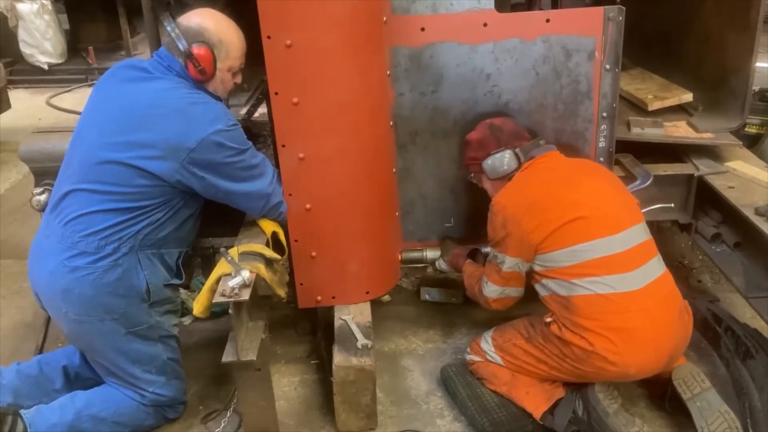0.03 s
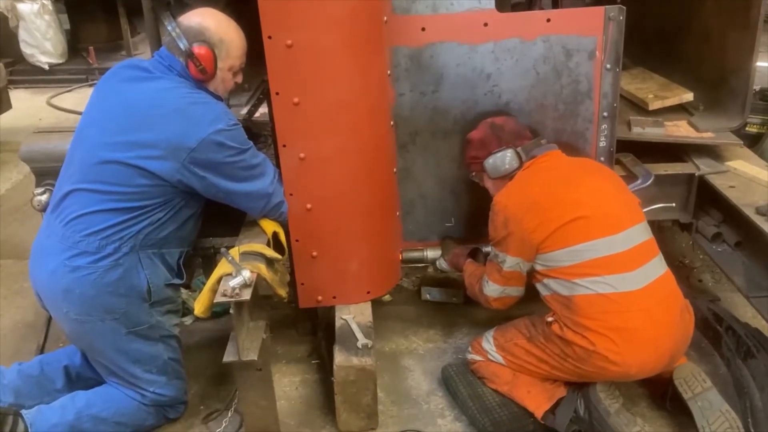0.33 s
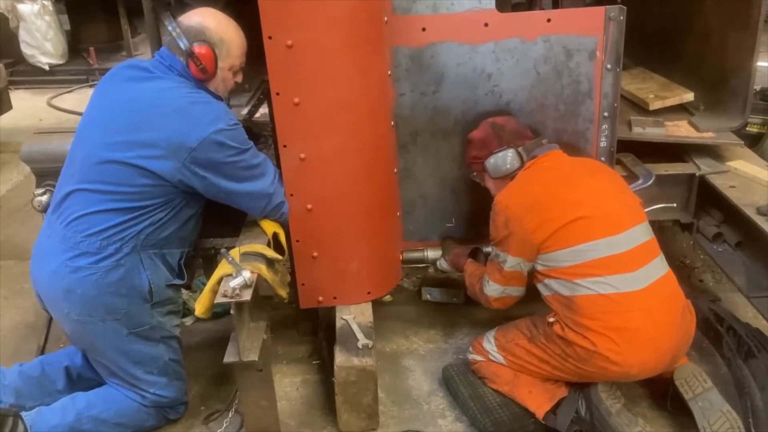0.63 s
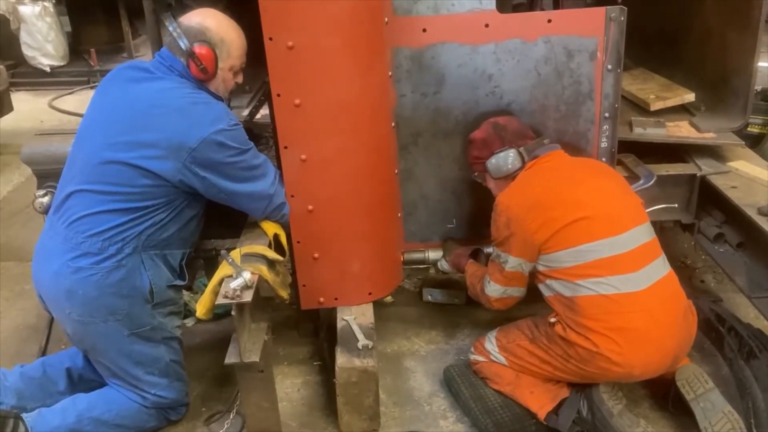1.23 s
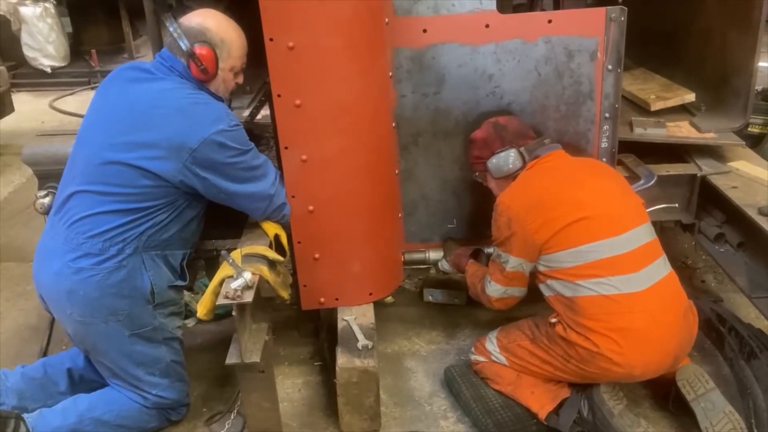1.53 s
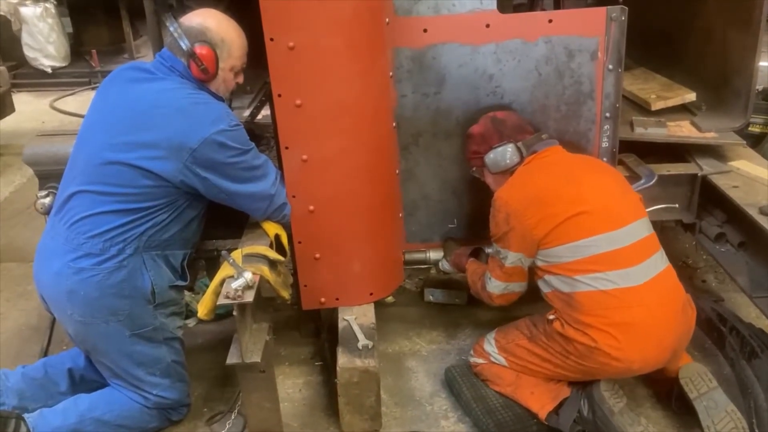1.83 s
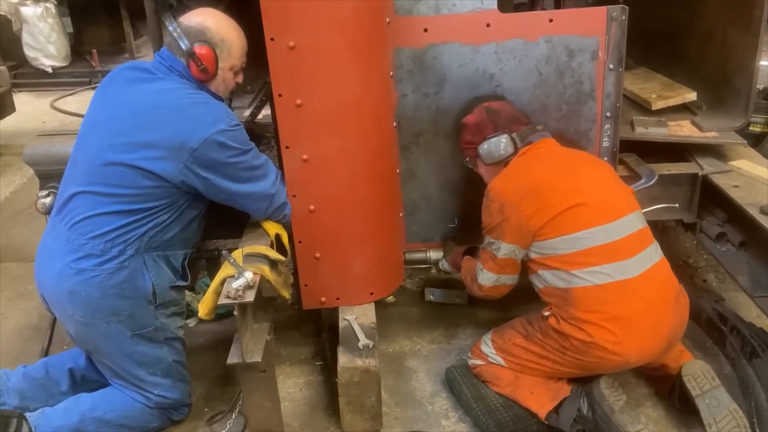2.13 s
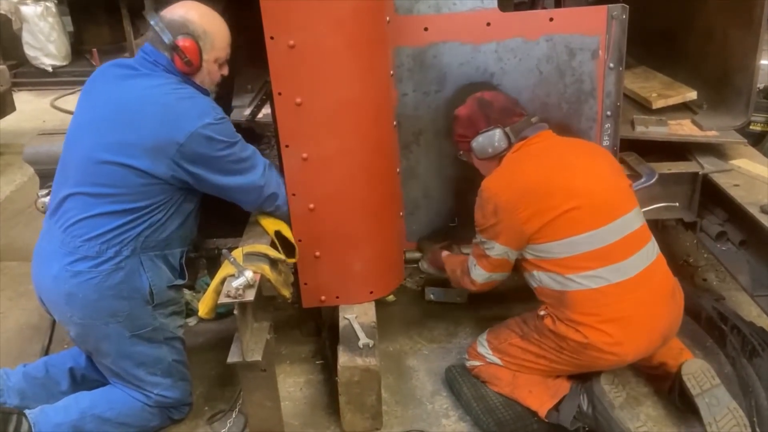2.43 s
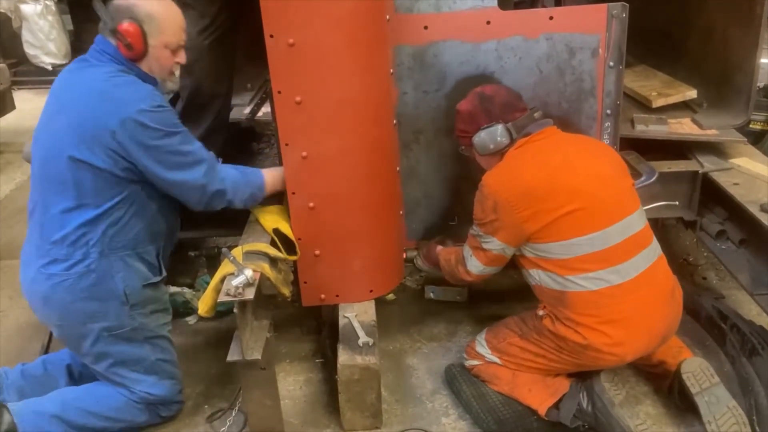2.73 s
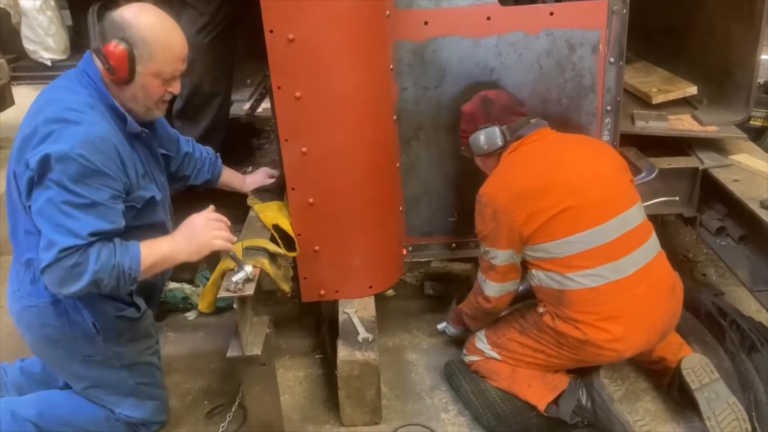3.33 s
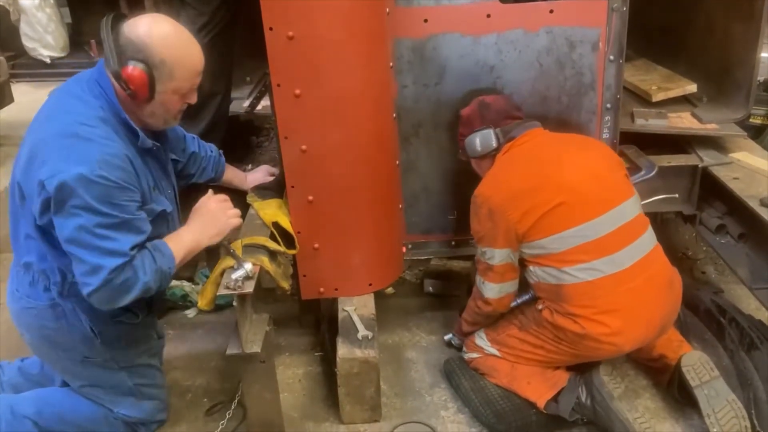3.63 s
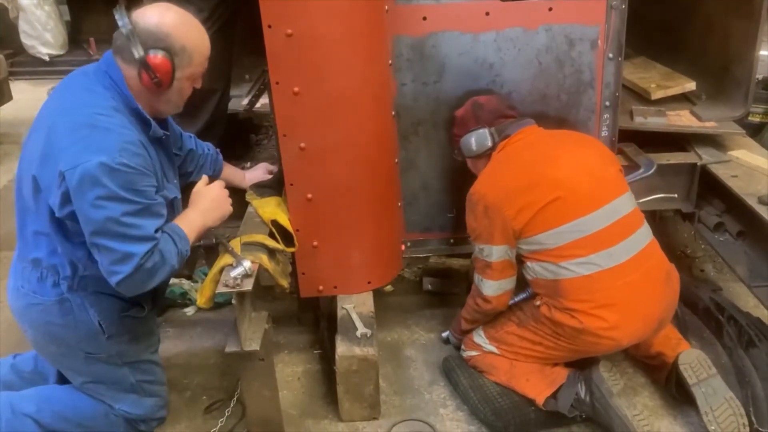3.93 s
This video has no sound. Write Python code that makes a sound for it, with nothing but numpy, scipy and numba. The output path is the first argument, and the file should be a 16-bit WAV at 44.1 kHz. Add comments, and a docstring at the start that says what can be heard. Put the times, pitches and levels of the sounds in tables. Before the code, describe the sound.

A pneumatic hammer is already riveting a steel panel, with loud, very rapid cracks and clangs over hissing air. From about 1.1 seconds the blows turn deeper and thumpier, stopping at 1.8 seconds. The workshop echo fades into faint hiss and rumble. A tool clinks lightly near 3 seconds, and around 3.8 seconds a tiny metal squeak precedes a soft double knock as it is put down.

```python
"""Riveting a steel panel

A pneumatic hammer drives a rivet at 19 blows a second in a reverberant workshop. Each blow is a steel
crack and a panel clang over hissing exhaust; once the rivet seats, bending waves add a thump.
One deep thud sits under the opening. The hammer stops and the hall rings out over a faint air hiss;
the tool clinks off the rivet, something squeaks, and the tool is put down with a knock."""
import sys
import numpy as np
from scipy import signal
from scipy.fft import rfft, irfft, next_fast_len
from scipy.io import wavfile
from scipy.ndimage import minimum_filter1d
from numba import njit

SR = 44100
rng = np.random.default_rng(int(sys.argv[2]) if len(sys.argv) > 2 else 0)


def transcribe(signal):
    """Save signal, clipped to [-1, 1], as a 16-bit WAV file at the path in sys.argv[1]."""
    frames = np.atleast_2d(signal).T
    limited = np.clip(frames, -1, 1)
    pcm = np.round(limited * 32767).astype(np.int16)
    wavfile.write(sys.argv[1], SR, pcm)


N = 176400

# the hammer's beat; blows fall evenly between these marks: blow number, t/s
BEAT_MARKS = [(0, -.4937), (11, .0850), (23, .7170), (29, 1.0336), (36, 1.4076), (42, 1.7254)]
# crack of the steel set (the hammer's tip) on the rivet: f/Hz, level/dB
CRACK_EQ = [(1500, -16), (4000, -9), (6000, -15.5), (7800, 5.5), (9200, -1.5), (10500, 7.5), (11800, 5.5),
            (13800, -1.5), (15500, 13.5), (16500, -30)]
# ping of the set: f/Hz, level/dB, t60/s
SET_MODES = [(5620, -6, .09), (6530, -6, .08), (6900, -6, .08), (7480, -3, .1), (8110, -3, .08),
             (10450, -4, .12), (11700, 4, .07), (15400, 5, .1)]
# dense clang of the panel: f/Hz, level/dB
CLANG_EQ = [(40, -17), (100, -5), (170, -3), (280, 0.5), (410, -9.5), (540, -6.5), (740, -2), (900, -6),
            (1100, -5), (1300, -9), (1900, -8), (3000, -14), (5000, -13.5), (7500, -15), (9200, -16.5),
            (11500, -10.5), (13800, -20), (15500, -30)]
# its decay: f/Hz, t60/s
CLANG_T60 = [(100, 0.12), (300, 0.15), (600, 0.095), (1000, 0.17), (2500, 0.13), (7000, 0.15),
             (15000, 0.076)]
# what a seated rivet adds to the clang: f/Hz, level/dB
SEATED_EQ = [(50, 14), (130, 8), (200, 9.5), (280, 6.5), (520, 8.5), (900, 3.5), (1500, 6), (5000, 6),
             (8000, 10.5), (12000, -4.5)]
# blows on the seated rivet; the last bites deepest: blow number, thump level/dB, bite level/dB
SEATED_BLOWS = [(32, 3, 0), (33, -4, 1), (34, 0, -2), (35, 0, 0), (36, -1, -2), (37, 2, 0), (38, 3, 2),
                (39, -5, 0), (40, 4, 2), (41, 2, 2), (42, -5, 9)]
# where the bite colours the clang: f/Hz, share (0-1)
BITE_SHARE = [(200, 0), (380, 1), (600, .8), (1500, .3), (5000, 0)]
# boom of the panel's strongest modes: f/Hz, level/dB, t60/s, change as the rivet settles/dB
PANEL_MODES = [(187, -12, .55, 4), (228, -5.5, .19, 11), (263, -7, .45, 8.5), (302, -1.5, .6, -2),
               (361, -7, .55, 5), (455, -4.5, .1, 3), (612, -8.5, .15, 2), (680, -2, .18, 5),
               (754, 4.5, .18, -4), (778, -1.5, .16, -1), (1005, -3.5, .12, 3), (1135, -5, .1, 4),
               (1485, -6.5, .13, 4), (1840, -7, .16, 4)]
# on the last tap the hammer lifts and the low modes swing freely: f/Hz, level/dB
LIFT_EQ = [(230, 5), (300, 6), (450, 0), (750, -3)]
# panel balance, left over right: f/Hz, level/dB
PANEL_PAN = [(200, 1.7), (400, 3.5), (700, 0), (1400, 0), (4000, 1.5), (8000, -1.5)]
# exhaust air: f/Hz, level/dB
EXHAUST_EQ = [(200, -7.5), (800, 6), (2000, 2), (4500, -4.5), (8000, -17.5), (9200, -33.5), (11500, -16),
              (14000, -28), (16000, -35)]
# tools moved and put down: t/s, level/dB, bass/dB, middle/dB, treble/dB
KNOCKS = [(2.952, -65.5, -2, 8, -6), (3.005, -75.5, -2, 4.5, 6), (3.882, -49.5, 2, -0.5, 0),
          (3.931, -52.5, 0.5, -1, -7.5)]
# body of a knock: f/Hz, level/dB
KNOCK_EQ = [(50, -25), (110, -5), (170, 2.5), (280, 5), (420, -6), (1100, -9), (2200, -11.5), (4500, -17.5),
            (8000, -19), (9200, -32), (10500, -19.5), (12300, -27), (13500, -42), (16000, -44)]
# its decay: f/Hz, t60/s
KNOCK_T60 = [(150, 0.64), (600, 0.33), (3000, 0.19), (11000, 0.29)]
# ring of the knocked tool: f/Hz, level/dB, t60/s
TOOL_MODES = [(254, -5, 0.34), (3740, -14, 0.5), (5857, -12, .33), (6282, -10, 0.3), (7117, -15, 0.35),
              (10050, -11, 0.2), (10620, -9, .22), (11040, -16, .23)]
# the tool leaving the rivet: t/s, level/dB, tilt about 1 kHz/(dB per octave)
CLINKS = [(2.950, -46, .5), (3.008, -60, 4)]
# ring of a clink: f/Hz, level/dB, t60/s
CLINK_MODES = [(694, 0, .1), (1570, -13, .17), (2150, -12, .14), (2680, -15, .17), (3074, -16, .22),
               (3914, -21, .09)]
# two swells of a metal squeak: t/s, width/s, f/Hz, level/dB
SQUEAKS = [(3.818, 0.011, 3930, -54), (3.843, 0.0062, 3830, -48.5)]
# colour of the workshop's reverb: f/Hz, level/dB
HALL_EQ = [(50, -24), (130, -10.5), (280, 3.5), (500, -4.5), (750, -6), (1100, -3), (2000, -3),
           (4000, -2.5), (7500, -9.5), (11000, -6.5), (16000, -26)]
# its decay: f/Hz, t60/s
HALL_T60 = [(50, 1.9), (120, 1.93), (280, 1.33), (600, 1.89), (2000, 2), (4000, 1.5), (7500, 1),
            (11000, 0.5), (16000, 0.5)]
# stereo image of reflected sound: f/Hz, left-right likeness (0-1)
ROOM_LIKENESS = [(60, 0.47), (250, 0.89), (600, 0.24), (1300, 0.15), (2800, 0.05), (8000, 0)]
# air hiss and room rumble: f/Hz, level/dB
ROOM_TONE_EQ = [(18, -35), (30, -12), (98, -6.5), (189, -8.5), (227, -1.5), (259, -7.5), (311, -4),
                (461, -16), (866, -20.5), (1320, -17), (2610, -17), (4080, -15), (7470, -14.5),
                (9220, -25.5), (11100, -17), (13700, -34), (16000, -41)]
# half-octave band centres for dense ringing: f/Hz
BANDS_HZ = 31.25 * 2 ** (np.arange(19) / 2)

PREROLL_S = 1  # the hammer is already running when the scene opens
SPAN = N + PREROLL_S * SR
TIME = np.arange(SPAN) / SR - PREROLL_S
BLOW_TIME = np.arange(8192) / SR
SETTLES_S, LAST_TAP_S = 1.06, 1.784
CRACK_DB, CRACK_T60_S, CRACK_ATTACK_S, CRACK_AHEAD_S = -40, .039, .0005, .0005
RETURN_DB, RETURN_S, CONTACT_S = -18, .035, .0009
CLANG_DB, SEATED_DAMP_S = -37, .032
REBOUND_DB, REBOUND_S, WALL_DB, WALL_S = -18.5, .0026, -16.5, .0125


def hammer():
    """The piston cracks the set on the rivet, rings the panel and clicks back; a weak tap ends the run."""
    numbers, marks_s = np.array(BEAT_MARKS).T
    times = np.r_[np.interp(np.arange(numbers[-1] + 1), numbers, marks_s), LAST_TAP_S]
    cracks = strikes([(1000, CRACK_T60_S)], likeness=[(1000, .58)], repeat=.12, count=len(times))
    clangs = strikes(CLANG_T60, ROOM_LIKENESS, repeat=.25, count=len(times))
    snap = 1 - np.exp(-BLOW_TIME / CRACK_ATTACK_S)
    contact = 1 - np.exp(-BLOW_TIME / CONTACT_S)
    seated = {row[0]: row[1:] for row in SEATED_BLOWS}
    steel, ping, panel, body = np.zeros((4, 2, SPAN))
    for blow, (start, crack, clang) in enumerate(zip(times, cracks, clangs)):
        strength, slip = rng.standard_normal(2)
        last_tap = start == times[-1]
        force = undb(.4 * strength - 3 * last_tap)
        if blow in seated:
            thump_db, bite_db = seated[blow]
            clang = seated_clang(clang, bite_db)
            add(body, force * undb(thump_db) * panel_thump(pitch=1 + .08 * slip), start)
        add(steel, force * crack * snap, start - CRACK_AHEAD_S)
        if not last_tap:
            add(steel, force * undb(RETURN_DB) * crack * contact, start + RETURN_S)
        add(panel, force * clang * contact, start)
        add(body, force * panel_boom(start > SETTLES_S and not last_tap, last_tap), start)
        add(ping, force * set_ping(), start)
    steel = undb(CRACK_DB) * np.sqrt(SR) * voiced(steel, CRACK_EQ) + ping
    panel = undb(CLANG_DB) * np.sqrt(SR) * voiced(panel, CLANG_EQ)
    rebound = undb(REBOUND_DB) * delay(panel, REBOUND_S)
    wall_slap = undb(WALL_DB) * delay(panel, WALL_S)
    panel = body + panel + rebound + wall_slap
    left = delay(steel[0], seconds=.0001716) + colour(panel[0], PANEL_PAN)
    return np.array([left, steel[1] + panel[1]])


def set_ping(level_db=-33):
    """The steel set rings in bright modes, a little different in level and tuning on each blow."""
    sway, drift = rng.standard_normal((2, len(SET_MODES)))
    return tones(SET_MODES, level_db + 2 * sway, detune=.01 * drift)


def panel_boom(settled, last_tap, level_db=-30.5):
    """The panel's strongest modes; as the rivet settles, the boom swells, sits lower and wanders more."""
    modes = np.array(PANEL_MODES)
    hz, settle_db = modes[:, 0], modes[:, 3] + 1
    sway, drift = rng.standard_normal((2, len(modes)))
    gains_db = level_db + settled * settle_db + last_tap * curve(LIFT_EQ, hz) + 1.4 * sway
    wander_hz = 9 if settled else 2
    return tones(modes[:, :3], gains_db, detune=wander_hz * drift / hz)


def seated_clang(clang, bite_db):
    """The seated rivet chokes and fattens the clang; a deeper bite pushes the low mids."""
    choked = colour(clang * np.exp(-BLOW_TIME / SEATED_DAMP_S), SEATED_EQ)
    return colour(choked, [(hz, share * bite_db) for hz, share in BITE_SHARE])


def panel_thump(pitch, start_hz=260, end_hz=48, fall_s=.009, peak_s=.016, level_db=-23):
    """A bending wave runs through the panel: its highs arrive first, so the pitch dives."""
    hz = pitch * (end_hz + (start_hz - end_hz) * np.exp(-BLOW_TIME / fall_s))
    envelope = BLOW_TIME / peak_s * np.exp(1 - BLOW_TIME / peak_s)
    return undb(level_db) * envelope * np.sin(2 * np.pi * np.cumsum(hz) / SR)


def exhaust(level_db=-31, close_s=.03):
    """Spent air hisses from the hammer until the valve closes."""
    valve = np.exp(-np.maximum(TIME - LAST_TAP_S, 0) / close_s)
    return undb(level_db) * valve * voiced(noise(SPAN, ROOM_LIKENESS), EXHAUST_EQ)


def thud():
    """A single deep thud under the opening blows."""
    return swell(peak_s=.012, width_s=.0088, hz=46.4, level_db=-17.5)


def tool_knocks(ring_db=5.5):
    """Tools are moved and put down: each knock is a dull body with a metal ring on top."""
    out = np.zeros((2, SPAN))
    for start, level_db, bass_db, middle_db, treble_db in KNOCKS:
        body = np.sqrt(SR) * voiced(dense_ring(KNOCK_T60, ROOM_LIKENESS, size=16384), KNOCK_EQ)
        metal = tones(TOOL_MODES, ring_db + rng.standard_normal(len(TOOL_MODES)))
        knock = body + metal[:body.shape[1]]
        eq = [(250, bass_db), (680, middle_db), (1100, 0), (6000, treble_db)]
        add(out, undb(level_db) * colour(knock, eq), start)
    return out


def tool_clinks():
    """The tool rings lightly as it is drawn off the rivet."""
    out = np.zeros((2, SPAN))
    octaves = np.log2(np.array(CLINK_MODES)[:, 0] / 1000)
    for start, level_db, tilt in CLINKS:
        add(out, tones(CLINK_MODES, level_db + tilt * octaves), start)
    return out


def squeak():
    """Metal squeaks in two quick swells just before the tool lands."""
    return sum(swell(*row) for row in SQUEAKS)


def hall(x, level_db=-4.5, onset_s=.0024):
    """Diffuse workshop reverb, fed from the left channel: long in the lows and mids, short on top."""
    tail = colour(dense_ring(HALL_T60, ROOM_LIKENESS, size=81920), HALL_EQ)
    tail *= 1 - np.exp(-np.arange(tail.shape[1]) / SR / onset_s)
    return undb(level_db) * signal.fftconvolve(x[:1], tail, axes=1)[:, :x.shape[1]]


def room_tone(level_db=-58.5):
    """A faint, steady bed of air hiss and workshop rumble."""
    return undb(level_db) * voiced(noise(N, ROOM_LIKENESS), ROOM_TONE_EQ)


def strikes(t60, likeness, repeat, count):
    """One object struck many times: part of its ring repeats exactly, part changes with the contact."""
    size = len(BLOW_TIME)
    shared = np.sqrt(repeat) * dense_ring(t60, likeness, size)
    return [shared + np.sqrt(1 - repeat) * dense_ring(t60, likeness, size) for _ in range(count)]


def dense_ring(t60, likeness, size):
    """Countless modes struck at once: each band dies at its own rate, with equal energy per Hz."""
    t, hz = np.arange(size) / SR, np.fft.rfftfreq(size, 1 / SR)
    spectrum, out = rfft(noise(size, likeness)), 0
    for centre, solo in zip(BANDS_HZ, np.eye(len(BANDS_HZ))):
        band = irfft(spectrum * curve(np.c_[BANDS_HZ, solo], hz), size)
        fade = np.exp(-np.log(1000) * t / curve(t60, centre))
        out = out + band * fade / np.linalg.norm(fade)
    return out


def tones(modes, gains_db, detune=0):
    """A struck object's modes as dying sines, neighbours swinging in opposite directions."""
    hz, db, t60 = np.array(modes, float).T[:, :, None]
    hz = hz * (1 + np.reshape(detune, (-1, 1)))
    t = np.arange(SR * 3 // 4) / SR
    polarity = np.cos(np.pi * np.arange(len(hz)))[:, None]
    envelope = undb(db + gains_db[:, None]) * np.exp(-np.log(1000) * t / t60)
    return np.sum(polarity * envelope * np.sin(2 * np.pi * hz * t), 0)


def swell(peak_s, width_s, hz, level_db):
    """A tone under a bell-shaped fade."""
    t = TIME - peak_s
    return undb(level_db) * np.exp(-(t / width_s) ** 2 / 2) * np.cos(2 * np.pi * hz * t)


def noise(size, likeness):
    """White stereo noise with a given likeness of left and right."""
    alike = np.clip(curve(likeness, np.fft.rfftfreq(size, 1 / SR)), 0, 1)
    mid, side = rfft(rng.standard_normal((2, size)))
    mid, side = mid * np.sqrt((1 + alike) / 2), side * np.sqrt((1 - alike) / 2)
    return irfft(np.array([mid + side, mid - side]), size)


def colour(x, eq):
    """Minimum-phase EQ through (f/Hz, level/dB) points, so attacks stay sharp."""
    size = next_fast_len(x.shape[-1] + 2048, True)
    cepstrum = irfft(np.log(undb(curve(eq, np.fft.rfftfreq(size, 1 / SR)))), size)
    cepstrum[1:size // 2] *= 2
    cepstrum[size // 2 + 1:] = 0
    return irfft(rfft(x, size) * np.exp(rfft(cepstrum)), size)[..., :x.shape[-1]]


def voiced(x, eq):
    """Colour a white sound and keep its power."""
    return colour(x, eq) / np.sqrt(np.mean(undb(curve(eq, np.arange(SR // 2))) ** 2))


def delay(x, seconds):
    """Delay with sub-sample precision."""
    size = next_fast_len(x.shape[-1] + 2048, True)
    shift = np.exp(-2j * np.pi * np.fft.rfftfreq(size, 1 / SR) * seconds)
    return irfft(rfft(x, size) * shift, size)[..., :x.shape[-1]]


def add(bus, x, start_s):
    """Mix x at a scene time into a bus that begins with the pre-roll."""
    offset = int(round((start_s + PREROLL_S) * SR))
    first, end = max(offset, 0), min(offset + x.shape[-1], bus.shape[-1])
    if end > first:
        bus[:, first:end] += x[..., first - offset:end - offset]


def curve(points, hz):
    """Read (f/Hz, value) points on a log-frequency axis."""
    knots_hz, values = np.array(points, float).T
    return np.interp(np.log(np.maximum(hz, 1)), np.log(knots_hz), values)


def undb(db):
    """Decibels to gain."""
    return 10 ** (np.asarray(db) / 20)


@njit
def follow(x, level, attack, release):
    """Envelope follower with separate rates up and down."""
    out = np.empty(len(x))
    for i in range(len(x)):
        level += (x[i] - level) * (attack if x[i] > level else release)
        out[i] = level
    return out


def scene():
    """Hammer, air and handling share one hall, over the room tone."""
    direct = hammer() + exhaust() + thud() + tool_knocks() + tool_clinks() + squeak()
    return (direct + hall(direct))[:, PREROLL_S * SR:] + room_tone()


def record(dry, threshold_db=-31, ratio=1.305, attack_s=.1, release_s=.037, hold_s=.53, top_hz=16300):
    """Gentle gain control ducks under the hammer, holds, then recovers; a steep low-pass cuts the top."""
    rectified = np.abs(dry).mean(0)
    level = follow(rectified, rectified[:SR // 2].mean(), 1 / (attack_s * SR), 1 / (release_s * SR))
    half_hold = int(hold_s * SR / 2)
    held = -minimum_filter1d(-level, 2 * half_hold + 1, origin=half_hold, mode="nearest")
    gain = np.minimum(undb(threshold_db) / held, 1) ** (1 - 1 / ratio)
    lowpass = signal.ellip(8, .2, 70, top_hz, fs=SR, output="sos")
    return signal.sosfilt(lowpass, dry * gain)


dry = scene()
out = record(dry)
transcribe(out)
```